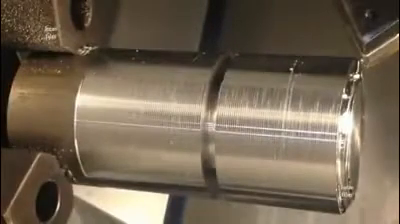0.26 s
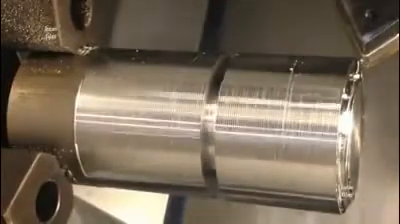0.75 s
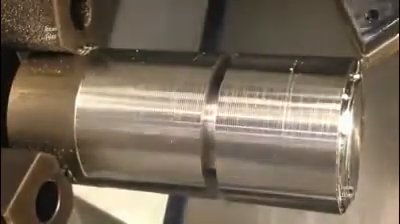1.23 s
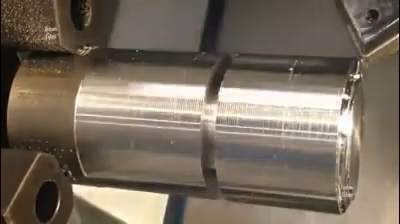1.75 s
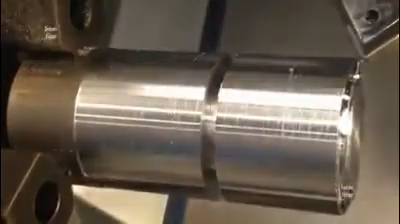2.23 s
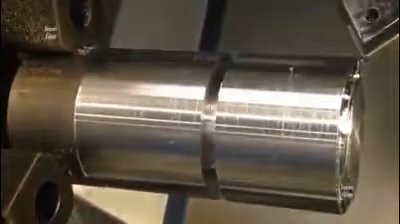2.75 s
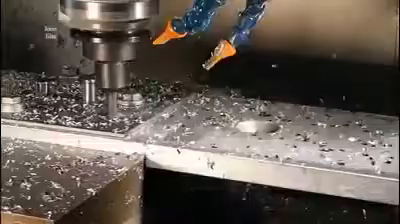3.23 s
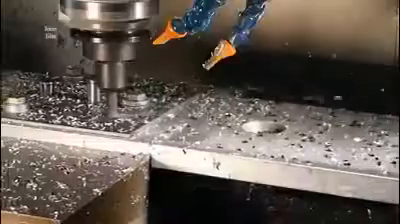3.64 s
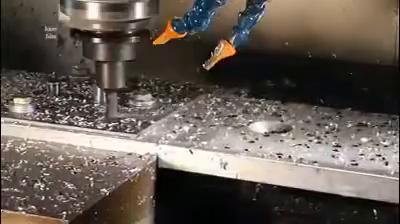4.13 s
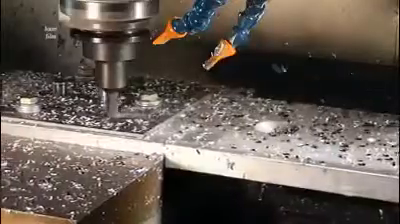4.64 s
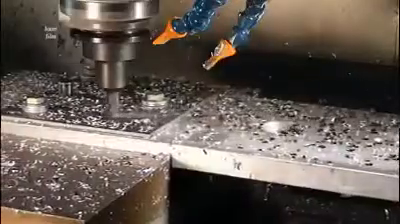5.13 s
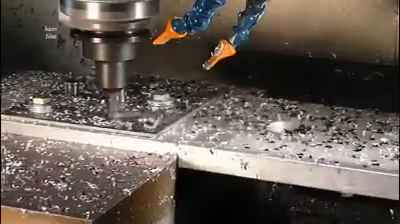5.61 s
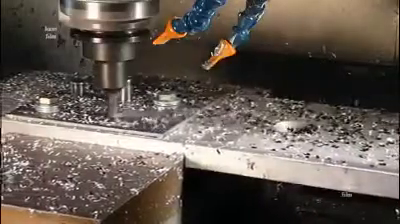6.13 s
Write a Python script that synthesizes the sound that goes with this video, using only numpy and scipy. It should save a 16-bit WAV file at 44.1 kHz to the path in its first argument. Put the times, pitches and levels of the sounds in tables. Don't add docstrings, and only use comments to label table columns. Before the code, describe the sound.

Inside a machine shop, pump and fan hum softly under faint air hiss. A steel latch clanks with a puff of air, a heavy guard door rumbles along its rail, slows, ticks and slams with rebounds. After a brief idle, the sound cuts hard to a steady milling whine with tearing chips, heard close through a duller microphone.

```python
import sys
import numpy as np
from scipy import signal
from scipy.fft import rfft, irfft, next_fast_len
from scipy.io import wavfile

SR = 44100
rng = np.random.default_rng(int(sys.argv[2]) if len(sys.argv) > 2 else 0)


def to_wav(s):
    ch = np.atleast_2d(s).T
    pcm = np.round(np.clip(ch, -1, 1) * 32767)
    wavfile.write(sys.argv[1], SR, pcm.astype(np.int16))


def ratio_of_db(decibels):
    return 10 ** (np.asarray(decibels, float) / 20)


N = 280917
TIME = np.arange(N) / SR
CUT_S = 2.977


def in_time(rows):
    s, *columns = np.transpose(rows)
    return [np.interp(TIME, s, c) for c in columns]


def rms_one(x):
    return x / np.sqrt(np.mean(x ** 2) + 1e-20)


def drift(rate_hz):
    pole = np.exp(-80 * np.pi * rate_hz / SR)
    white = rng.standard_normal(N // 40 + 2002)
    slow = signal.lfilter([1], [1, -2 * pole, pole * pole], white)[2000:]
    return np.interp(np.arange(N) / 40, np.arange(len(slow)), rms_one(slow - slow.mean()))


def coloured(x, spectrum, peaks=()):
    size = next_fast_len(N)
    hz = np.maximum(np.arange(size // 2 + 1) * SR / size, 1)
    at_hz, level_db = np.transpose(spectrum)
    shape_db = np.interp(np.log(hz), np.log(at_hz), level_db)
    outside = np.maximum(hz / at_hz[-1], at_hz[0] / hz)
    shape_db = shape_db - 60 * np.log2(np.maximum(outside, 1))
    for centre_hz, width_hz, lift_db in peaks:
        shape_db = shape_db + lift_db / (1 + (2 * (hz - centre_hz) / width_hz) ** 2)
    return rms_one(irfft(rfft(x, size) * ratio_of_db(shape_db), size)[:N])


def grit(lumpy_db, rate_hz):
    return rng.standard_normal(N) * ratio_of_db(lumpy_db * drift(rate_hz))


def tone(phase, wander, rate_hz):
    in_phase = (1 + wander * drift(rate_hz)) * np.cos(phase)
    quadrature = wander * drift(rate_hz) * np.sin(phase)
    return np.sqrt(2) * (in_phase + quadrature)


def struck(blows, modes, scatter_db):
    out = np.zeros(N)
    luck = rng.standard_normal((len(blows), len(modes)))
    for (s, peak_db, soft_s), draws in zip(blows, luck):
        start = round(s * SR)
        t = TIME[:min(SR // 2, N - start)]
        rise = 1 - np.exp(-t / soft_s)
        for (hz, level_db, t60_s), draw in zip(modes, draws):
            dull = 1 / (1 + (hz * soft_s / 2) ** 2)
            ring = np.sin(2 * np.pi * hz * t) * ratio_of_db(-60 * t / t60_s)
            level = ratio_of_db(peak_db + level_db + scatter_db * draw)
            out[start:start + len(t)] += level * dull * rise * ring
    return out


# time in seconds, level against full speed in dB.
ROLL = [(.3, -30.5), (.45, -7), (.6, -2.5), (.76, -0.5), (.95, -4.5), (1.15, -12), (1.45, -25.5),
        (1.62, -10), (1.85, -7.5)]


def rolling_db():
    stop_s = 1.9
    return in_time(ROLL)[0] - 300 * np.maximum(TIME - stop_s, 0)


# time in seconds, depth in dB, recovery in seconds.
DUCKS = [
    (.22, -7, .2),
    (2.05, -4, 0.22),
]


def ducking():
    roll_duck_db, fade_in_s = -3, .045
    db = roll_duck_db * ratio_of_db(rolling_db())
    for s, depth_db, recover_s in DUCKS:
        db = db + np.interp(TIME - s, [-.04, 0, recover_s], [0, depth_db, 0])
    return ratio_of_db(db) * np.clip(0.201 + TIME / fade_in_s, 0, 1)


# frequency in Hz, rms in dB, unsteadiness 0 to 1.
IDLE_LINES = [(226, -48, .5), (268, -42.5, .45), (382, -53, .5), (553, -47, .4), (721, -53, .4),
              (765, -44, .15), (806, -55, .4)]


def idling():
    return sum(ratio_of_db(db) * tone(2 * np.pi * hz * TIME, wander, rate_hz=9.5) for hz, db, wander in IDLE_LINES)


# frequency in Hz, density in dB per Hz.
AIR_COLOUR = [(1880, -32.5), (3200, 4.5), (3510, 3.5), (4320, -3.5), (7470, -8.5), (8640, -16.5),
              (11200, -50.5), (19000, -120)]


def air_leak(gain):
    return gain * ratio_of_db(3.5) * coloured(grit(lumpy_db=1.2, rate_hz=70), AIR_COLOUR)


# time in seconds, level in dB, 60 dB fall in seconds.
JOLTS = [(.045, -31.5, 1), (0.101, -25.5, 0.9), (.25, -33.5, .5), (.30, -31.5, 1), (.455, -28.5, .3),
         (.49, -29, .5), (.605, -28, .4), (0.656, -23.5, 0.3), (.765, -28, 1.5), (.83, -33, 1),
         (.895, -30, 0.5), (0.941, -29.5, .3), (1.12, -34.5, 0.2), (1.22, -36, 0.3), (1.33, -37.5, .5),
         (1.60, -37.5, 0.8), (1.815, -30, .5), (1.875, -24, 0.75), (1.954, -25, .5), (2.059, -26, 0.1),
         (2.255, -34, 0.3), (2.43, -37, 0.5), (2.93, -43, 0.1)]
JOLT_RISE_S = 0.0057
# rest level in dB, full speed level in dB,
# share of the speed's swing, gain for jolts in dB.
SHAKEN = [(-45, -35.5, 0.76, -3.5), (-39, -29, 0.76, -8), (-46.5, -39, 1.1, -21), (-57, -53.5, 1, -40)]


def shaking(duck):
    jolt_power, t = np.zeros(N), TIME[:SR // 2]
    for s, db, fall_s in JOLTS:
        start = round((s - JOLT_RISE_S) * SR)
        push = ratio_of_db(db - 60 * t / fall_s) * np.minimum(t / JOLT_RISE_S, 1)
        jolt_power[start:start + len(t)] += push ** 2
    speed_db, gains = rolling_db(), []
    for rest_db, full_db, share, jolt_db in SHAKEN:
        rest = (duck * ratio_of_db(rest_db)) ** 2
        rolling = ratio_of_db(full_db + share * speed_db) ** 2
        gains.append(np.sqrt(rest + rolling + ratio_of_db(jolt_db) ** 2 * jolt_power))
    return gains


# frequency in Hz, density in dB per Hz.
THUD_COLOUR = [(15, -41.5), (25, -13.5), (40, -7), (70, 5.5), (86, 5), (170, -13), (220, -36), (370, -120)]
PANEL_COLOUR = [(82, -47), (140, -2.5), (268, -1), (332, -2.5), (485, -3.5), (549, -2.5), (621, -7),
                (762, -9), (869, -22), (1000, -31), (1300, -48), (2200, -120)]
RAIL_COLOUR = [(500, -33), (850, -2), (1300, -5), (1430, -8.5), (1520, -6), (1650, -7), (2290, -7.5),
               (4200, -20.5), (5460, -48), (9240, -120)]


def door(thud_gain, panel_gain, rail_gain):
    thud = thud_gain * coloured(grit(lumpy_db=-1.0, rate_hz=15), THUD_COLOUR)
    panel = panel_gain * ratio_of_db(-0.5) * coloured(grit(lumpy_db=2.5, rate_hz=20), PANEL_COLOUR)
    rail = rail_gain * ratio_of_db(4.0) * coloured(grit(lumpy_db=0.5, rate_hz=46), RAIL_COLOUR)
    return thud + panel + rail


# frequency in Hz, level in dB, t60 in seconds.
FRAME = [(49, -2, 0.14), (77, 0, .18), (100, -12, .12)]


def frame_knocks():
    lift_db, soft_s = 9, .009
    blows = [(s - JOLT_RISE_S, db + lift_db, soft_s) for s, db, _ in JOLTS]
    return struck(blows, FRAME, scatter_db=2.0)


# start in seconds, level in dB, 60 dB fall in seconds,
# lowest Hz, highest Hz.
PUFFS = [(.062, -41, .1, 600, 4000), (.0905, -32, .12, 5000, 8500), (.091, -29, .27, 3000, 7000),
         (.092, -28, .29, 800, 3200), (.319, -46, .16, 5500, 9000), (.323, -36, .21, 3000, 5800),
         (.324, -41, .18, 1200, 2800), (1.7035, -38, .12, 1200, 7000), (1.83, -37, .14, 1500, 5000),
         (1.850, -30, .06, 600, 4500), (1.860, -26, .07, 2800, 7500), (1.861, -22, .17, 500, 2000),
         (1.887, -28, .13, 1200, 4500), (1.875, -36, .2, 2500, 6500), (.072, -31, .45, 550, 1300),
         (.06, -34, .6, 100, 550), (.326, -40, .2, 700, 1250)]


def puffs():
    out, t = np.zeros(N), TIME[:SR // 3]
    noise = grit(lumpy_db=1.2, rate_hz=200)
    for k, (s, db, fall_s, low_hz, high_hz) in enumerate(PUFFS):
        start = round(s * SR)
        band = signal.butter(2, [low_hz, high_hz], "band", fs=SR, output="sos")
        hiss = rms_one(signal.sosfilt(band, noise[k * len(t):(k + 1) * len(t)]))
        decay = ratio_of_db(db - 60 * (t / fall_s) ** 1.6)
        out[start:start + len(t)] += decay * np.minimum(t / .001, 1) * hiss
    return out


# time in seconds, peak in dB, contact softness in seconds.
LATCH_BLOWS = [
    (.0725, -6.5, 0.003),
    (.092, -21, 0.00016),
    (.110, -9.5, 0.0044),
    (.322, -34.5, 0.00088),
]
# frequency in Hz, level in dB, t60 in seconds.
LATCH = [(423, 3, 0.1), (427, -9, 0.22), (658, -13.5, 0.26), (1001, -10, 0.33), (884, -13.5, .35),
         (2500, -17.5, 0.11)]


def latch():
    return struck(LATCH_BLOWS, LATCH, scatter_db=0.61)


# time in seconds, peak in dB, contact softness in seconds.
BUMP_BLOWS = [
    (.328, -20, 0.0063),
    (.455, -29, 0.004),
    (.64, -27, 0.0055),
    (1.96, -26, 0.0037),
    (2.03, -26.5, 0.002),
]
# frequency in Hz, level in dB, t60 in seconds.
BUMP = [(135, -4, .25), (180, -1, .22), (300, -3, .25), (385, -6, .22)]


def bumps():
    return struck(BUMP_BLOWS, BUMP, scatter_db=4.2)


# frequency in Hz, density in dB per Hz.
VENT_COLOUR = [(700, -30), (1400, -7), (3060, -1.5), (4300, -5), (8640, -13.5), (11200, -45.5)]


def vent():
    start_s, rise_s, end_s, fall_s, level_db = 1.62, 0.077, 1.87, 0.1, -42
    opening = (TIME - start_s) / rise_s
    closing = 1 - (TIME - end_s) / fall_s
    flow = np.clip(np.minimum(opening, closing), 0, 1) ** 2
    return ratio_of_db(level_db + 3.0) * flow * coloured(grit(lumpy_db=1.2, rate_hz=70), VENT_COLOUR)


# time in seconds, peak in dB, contact softness in seconds.
TICK_BLOWS = [
    (1.7035, -18, 0.00019),
    (1.715, -21, 0.00026),
]
# frequency in Hz, level in dB, t60 in seconds.
TICK = [(1060, 5.5, .012), (1150, -13.5, 0.055), (870, -14.5, 0.072), (4350, -2, 0.012)]


def ticks():
    return struck(TICK_BLOWS, TICK, scatter_db=1.6)


# time in seconds, peak in dB, contact softness in seconds.
SLAM_BLOWS = [
    (1.812, -22, .004),
    (1.838, -27, 0.0034),
    (1.860, -17, 0.00036),
    (1.872, -14, .002),
    (1.890, -17.5, 0.0009),
    (1.900, -20, .003),
    (1.925, -15.5, 0.0032),
    (1.955, -19, 0.0053),
    (2.045, -29.5, .005),
]
# frequency in Hz, level in dB, t60 in seconds.
SLAM = [(74, -10.5, 0.272), (91.4, -14, 0.12), (119, -8, 0.23), (214.5, -1, 0.25), (183.5, -13, 0.18),
        (372.3, -10, 0.158), (960, -10, 0.11), (1107, -2.5, 0.081), (1415, -8.5, 0.098)]


def slam():
    return struck(SLAM_BLOWS, SLAM, scatter_db=2.76)


# time in seconds, level in dB.
MILL = [(2.99, -29), (3.2, -32), (3.34, -29.5), (3.86, -30.5), (4.05, -29), (4.29, -29), (4.42, -35),
        (4.94, -28), (5.13, -32.5), (5.29, -29.5), (5.4, -34), (5.6, -28), (5.75, -28.5), (5.86, -34),
        (5.98, -30.5), (6.16, -31), (6.24, -33), (6.37, -30)]
# multiple of the spindle speed, level in dB.
SPINDLE_ORDERS = [(1, -21), (2, -21.5), (3, -10.5), (4, -9), (5, -8), (6, -25), (7, 1), (8, -10),
                  (9, -10.5), (10, -13), (11, -20.5),
                  (15, -18), (17, -27), (20, -21), (23, -26), (24, -26), (40, -17), (41, -21), (44, -23)]


def tooth_orders(load_db, turn):
    out = 0
    for k, db in SPINDLE_ORDERS:
        lag = 1.1 * (k % 2) + .45 * rng.standard_normal()
        follow, wander = (.95, .1) if k == 7 else (.3, .22)
        level = ratio_of_db(db - 28.5 + follow * (load_db + 30.5))
        out = out + level * tone(k * turn - lag, wander, rate_hz=3.1)
    return out


# time in seconds, lift in dB.
CHIP_BURSTS = [
    (3.3, 1.3),
    (5.42, 4.4),
]
# frequency in Hz, density in dB per Hz.
CHIP_COLOUR = [(18, -58), (30, -35.5), (150, -15), (198, -11), (339, -12), (393, -12.5), (473, -5.5),
               (737, -17), (824, -16), (1090, -16), (2500, -23.5), (3250, -53), (5500, -120)]
SPRAY_COLOUR = [(1350, -35.5), (2300, -12), (2600, -6), (2780, -6), (2960, -6), (3500, -10), (3680, -8),
                (3770, -16.5), (3810, -25), (4050, -23.5), (4300, -29.5), (4800, -35), (5200, -48),
                (5300, -57)]
# frequency in Hz, width in Hz, lift in dB.
PLATE = [(196, 17, 8.5), (617, 35, 4), (845, 85, 5.5), (1950, 330, 3.5)]


def chip_noise(load_db, turn):
    level_db, follow, sag_db_per_s, burst_s = -33, 0.44, 0.58, .07
    swing_db = load_db - np.mean(load_db[TIME > CUT_S])
    chip_db = level_db + follow * swing_db - sag_db_per_s * (TIME - CUT_S)
    for s, db in CHIP_BURSTS:
        chip_db = chip_db + db * np.exp(-((TIME - s) / burst_s) ** 2)
    bite = 1 + 0.11 * np.cos(2 * turn) + 0.053 * np.cos(turn)
    chips = coloured(bite * grit(lumpy_db=.6, rate_hz=25), CHIP_COLOUR, PLATE)
    spray = coloured(bite * grit(lumpy_db=.7, rate_hz=20), SPRAY_COLOUR)
    return ratio_of_db(chip_db + 5.0) * chips + ratio_of_db(0.76 * (chip_db + 35.0) - 41.0) * spray


def cutter():
    spindle_hz = 67.93
    load_db, = in_time(MILL)
    turn = 2 * np.pi * spindle_hz * TIME
    return tooth_orders(load_db, turn) + chip_noise(load_db, turn)


# frequency in Hz, rms in dB.
DRIVE_LINES = [(2650, -56), (2686.3, -48), (2747, -57), (2777.9, -52), (2808.7, -52), (2836, -56),
               (2853, -56), (3207, -61), (3262, -60), (3480, -63), (3920, -61), (3989, -68), (4057, -70),
               (4124, -73), (4262, -72), (4463, -78), (4802, -83), (883.1, -52), (748.6, -53)]


def drive():
    motor_hz, motor_db = 816.1, -34
    beat_hz, null_s, depth = .8, 5, .94
    beat = np.sqrt(1 - depth * np.cos(np.pi * beat_hz * (TIME - null_s)) ** 2)
    out = ratio_of_db(motor_db) * beat * tone(2 * np.pi * motor_hz * TIME, wander=0.03, rate_hz=2.9)
    for hz, db in DRIVE_LINES:
        out = out + ratio_of_db(db) * tone(2 * np.pi * hz * TIME, wander=0.17, rate_hz=1.6)
    return out


def scene():
    duck = ducking()
    thud, panel, rail, leak = shaking(duck)
    lathe = duck * idling() + air_leak(leak) + door(thud, panel, rail) + frame_knocks()
    lathe = lathe + puffs() + latch() + bumps() + vent() + ticks() + slam()
    mill = cutter() + drive()
    first = ratio_of_db(np.interp(TIME - CUT_S, [.011, .014, .055, .06], [0, -15, -19, -90]))
    second = np.clip((TIME - CUT_S) / .008, 0, 1)
    return (first * lathe + second * mill)[None]


def dropouts(x):
    size = next_fast_len(N)
    spectrum, hz = rfft(x, size), np.arange(size // 2 + 1) * SR / size
    edges_hz = np.arange(2890, 3800, 60)
    out = x.copy()
    for low, high in zip(edges_hz, edges_hz[1:]):
        strip = irfft(spectrum * ((hz >= low) & (hz < high)), size)[:N]
        rarity = 1.3 - 1.2 * (low - edges_hz[0]) / (edges_hz[-1] - edges_hz[0])
        out -= .93 * np.clip(8 * (drift(4.0) - rarity), 0, 1) * strip
    return out


def band_limit(x):
    return signal.sosfilt(signal.butter(12, 8790, fs=SR, output="sos"), x)


def record(dry):
    top_cut = signal.ellip(10, .5, 70, 8720, fs=SR, output="sos")
    mix = signal.sosfilt(top_cut, dropouts(dry[0]))
    return band_limit(mix[None])


dry = scene()
out = record(dry)
to_wav(out)
```